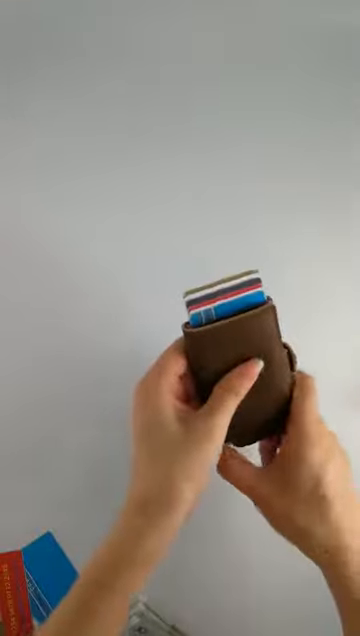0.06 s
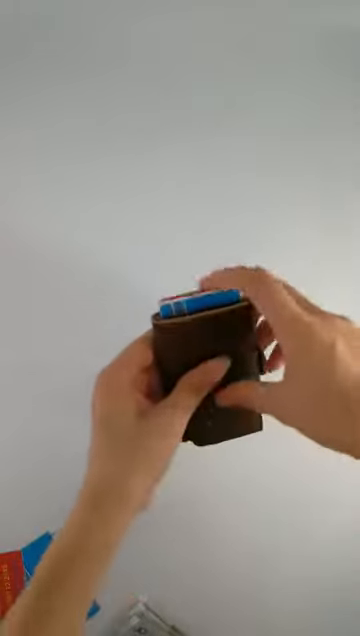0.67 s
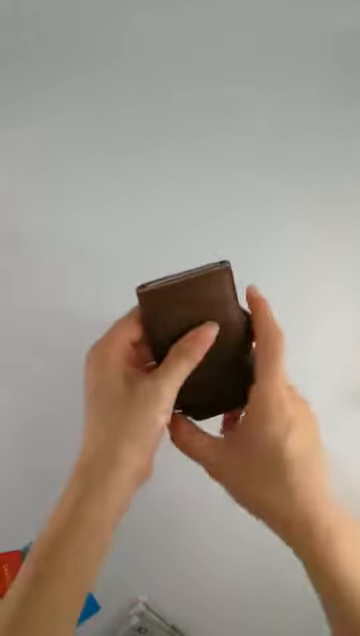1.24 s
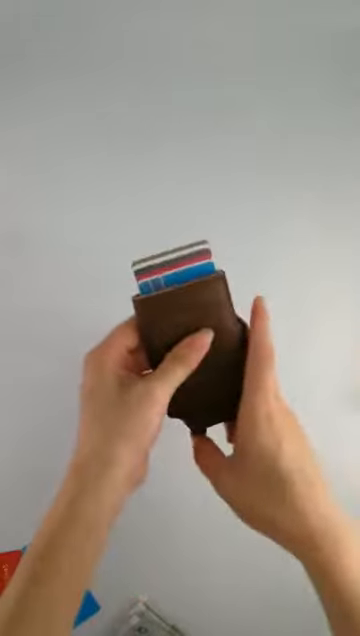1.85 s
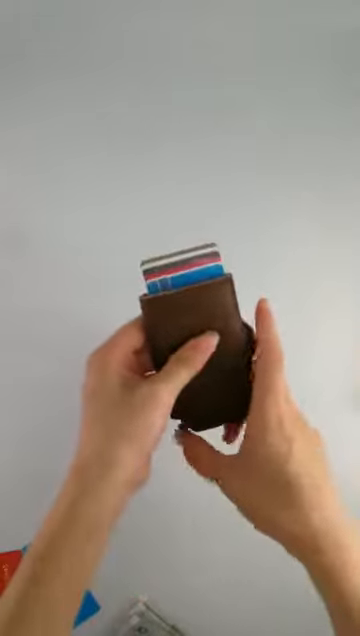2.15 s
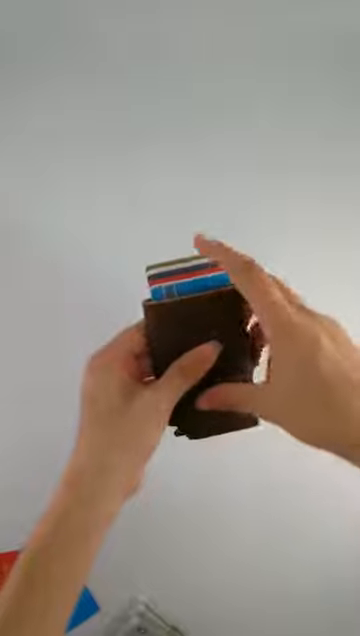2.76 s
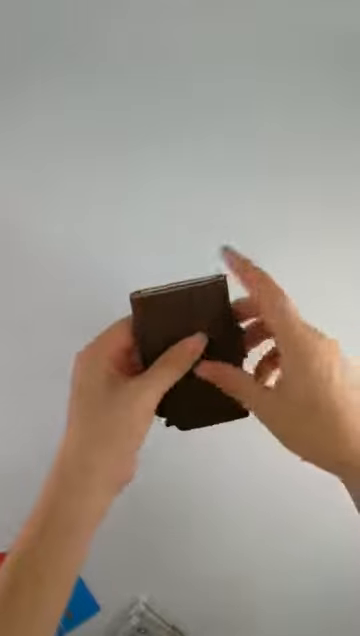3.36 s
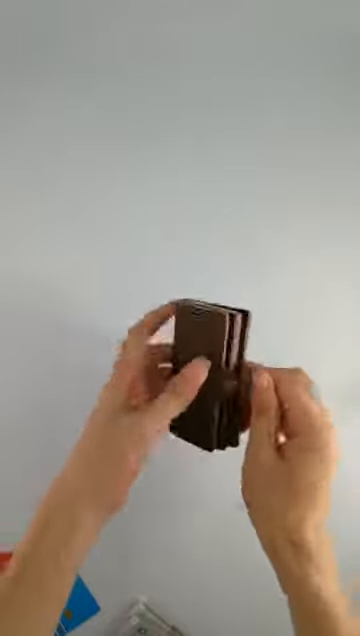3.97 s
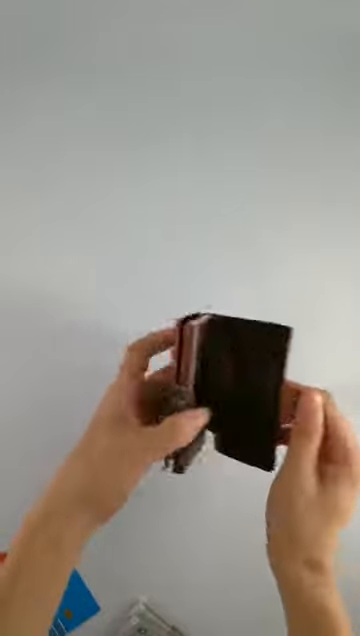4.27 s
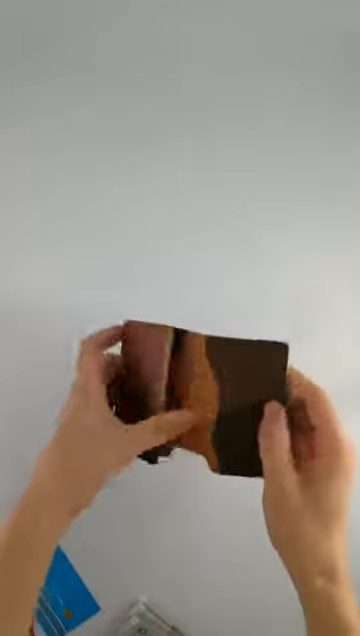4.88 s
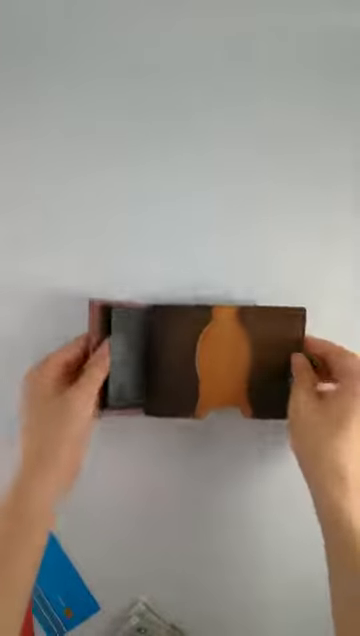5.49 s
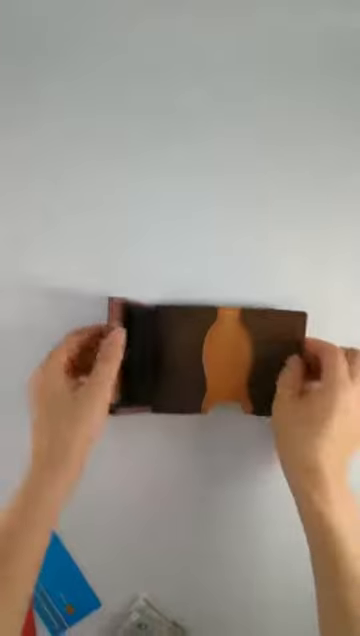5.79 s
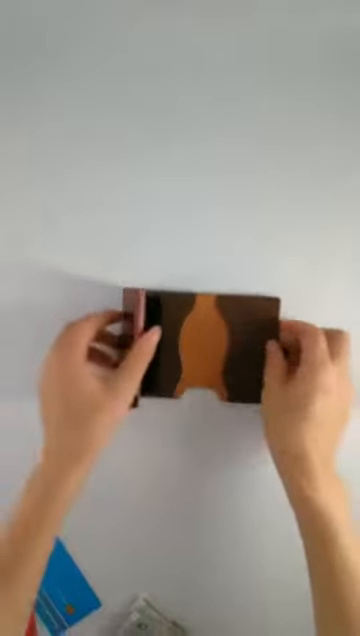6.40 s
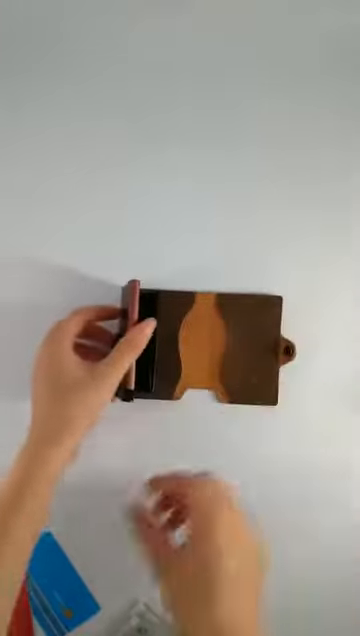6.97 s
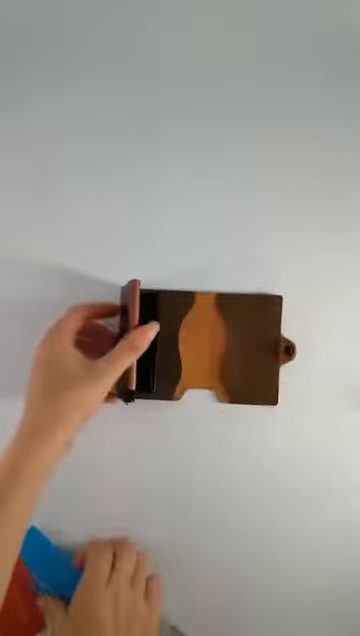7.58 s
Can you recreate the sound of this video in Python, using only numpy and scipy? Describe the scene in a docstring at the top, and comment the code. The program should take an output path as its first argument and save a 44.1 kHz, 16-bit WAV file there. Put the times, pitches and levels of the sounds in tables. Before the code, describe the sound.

A spring-loaded card wallet clicks and snaps sharply, then leather rustles open and loose cards scrape a table over a low room hum.

```python
"""A wallet with a pop-up card case

A leather wallet with a spring-loaded metal card case is handled above a table in a small, humming room.
The lever clicks, the cards pop up and are pushed back, the press stud snaps open and the flaps unfold.
Then an arm slides across the table and the hand drags some loose cards. The clicks are short blows
that make the metal ring; the rubbing and scraping are many tiny slips over a smooth hiss."""
import sys
import numpy as np
from scipy import signal
from scipy.fft import rfft, irfft
from scipy.io import wavfile
from scipy.ndimage import uniform_filter1d

SR = 44100
rng = np.random.default_rng(int(sys.argv[2]) if len(sys.argv) > 2 else 0)


def output_pcm(signal):
    """Save a mono or channel-first signal as 16-bit PCM at the path in sys.argv[1].

    Samples are clipped to [-1, 1] before scaling.
    """
    pcm = np.clip(np.atleast_2d(signal).T, -1, 1) * 32767
    wavfile.write(sys.argv[1], SR, np.round(pcm).astype(np.int16))


N = 341334
TIME = np.arange(N) / SR

# Levels in the tables are relative: they set how strong the rows are next to one another.
# The steady hum of the room. Each row: pitch in Hz, level in dB.
HUM_TONES = [(43.1, -66.5), (102.3, -53.5), (150.7, -55), (301.5, -64), (759.0, -76)]
# The tone colour of the room's noise. Each row: frequency in Hz, level in dB.
AIR_COLOUR = [(13, -44), (22, -3.5), (53, -5.5), (92, -6), (142, -1.5), (246, -16.5), (306, -12.5),
              (414, -22.5), (758, -20.5), (1390, -22.5), (1550, -24.5), (2330, -28), (2600, -30),
              (13100, -50), (15500, -46)]
# How alike that noise is on both sides. Each row: frequency in Hz, likeness from -1 (opposite) to 1 (same).
AIR_LIKENESS = [(60, 0.98), (150, 1), (380, 0.053), (950, -0.13), (2380, 0.079), (5980, 0.1),
                (15000, -0.81)]

# Soft thuds of the stud's leather tab, then of the hand landing on the table and pulling at the cards.
# Each row: start in seconds, length in seconds, level in dB, pitch in Hz, width in Hz.
SOFT_THUDS = [(3.557, 0.012, -48.5, 700, 220), (7.181, 0.057, -53.5, 930, 500), (7.56, .16, -58, 260, 110)]
# Skin sliding over the table. Each row: time in seconds, level of the hiss in dB.
SKIN_HISS = [(6.5, -83), (6.757, -75.5), (6.87, -58), (7.238, -58.5), (7.322, -66.5), (7.44, -66.5)]
# Hollow tones of the table, each loudest at its own point of the arm's travel.
# Each row: pitch in Hz, width in Hz, level in dB, loudest moment in seconds, spread in seconds.
TABLE_TONES = [(326, 17, -63, 6.78, 0.12), (560, 60, -66, 6.97, 0.19), (925, 50, -61, 6.98, .2),
               (1150, 800, -58, 6.91, 0.24), (1270, 150, -57, 6.82, 0.07), (1166, 130, -65, 7.06, 0.15),
               (1520, 90, -59.5, 6.83, .05), (1630, 170, -60, 7.17, .22)]
# The open wallet, then the loose cards, are dragged over the table.
# Each row: start in seconds, length in seconds, level in dB.
TABLE_DRAGS = [(5.809, 0.031, -51), (5.893, 0.055, -54.5), (5.958, 0.065, -58), (7.518, 0.065, -56),
               (7.584, 0.12, -46)]
# The wallet, then the loose cards, rasp on the table.
# Each row: start in seconds, length in seconds, level in dB, centre in Hz, width in octaves.
TABLE_RASPS = [(5.812, .05, -50.5, 1950, .55), (7.583, 0.041, -44.5, 2700, .9),
               (7.65, 0.052, -39.5, 3200, .5)]

# The bass, middle and treble of a rub. Each row: low edge in Hz, high edge in Hz.
RUB_BANDS = [(880, 1830), (2200, 7900), (5600, 14800)]
# Fingers and flaps rub on leather.
# Each row: start in seconds, length in seconds, level in dB, brightness in dB.
LEATHER_RUBS = [ (0.531, 0.1, -66, 12.5), (0.85, .03, -72, 5), (1.37, 0.05, -79, 19),
                (1.514, 0.099, -60, -2), (2.828, 0.047, -73.5, 7), (2.901, 0.1, -65, 7),
                (3.195, 0.044, -65, 3.5), (3.738, 0.11, -62, -1), (3.8, .05, -65, 6), (4.19, .05, -68, 2),
                (4.278, 0.06, -63.5, 4.5), (4.44, .04, -69, 4), (4.508, 0.03, -49.5, -1),
                (4.737, 0.12, -75, 0), (4.88, 0.18, -61.5, 4.5), (5.35, 0.097, -73.5, 2),
                (5.81, 0.06, -60, 0), (5.89, .12, -67, 2)]
# The fingers keep shifting their grip, more while the flaps unfold. Same columns as the rubs.
GRIP_SHIFTS = [(0, 4.1, -75, 0.5), (4.163, 2.1, -70, -0.5)]
# The leather crackles where it is bent. Each row: start in seconds, length in seconds, level in dB.
LEATHER_BENDS = [(4.195, .06, -59), (4.31, .05, -57), (4.9, .12, -49), (5.9, .14, -54)]
# The case scrapes out of the flap and sings.
# Each row: start in seconds, length in seconds, level in dB, strength of the upper notes in dB.
CASE_SQUEAKS = [(4.902, .017, -43, -14), (4.94, 0.05, -52.5, 0), (4.984, 0.021, -40.5, -1)]
# The notes it sings, lowest first. Each row: pitch in Hz, width in Hz, level in dB.
SQUEAK_TONES = [(2630, 300, 2), (3500, 400, -5), (4580, 380, 0.5), (5030, 240, -5), (5900, 500, -11)]

# Loose cards skid over the table.
# Each row: start in seconds, length in seconds, level in dB, brightness in dB.
CARD_SKIDS = [(7.035, 0.025, -49, -2), (7.184, 0.042, -50.5, 3.5), (7.454, 0.053, -50.5, 3),
              (7.566, 0.069, -44, 7), (7.664, 0.042, -43, 10.5)]
# The broad tone colour of a skidding card. Each row: centre in Hz, width in Hz, level in dB.
SKID_COLOUR = [(2900, 1800, 10), (10500, 4500, 2)]
# Cards slide in the case; how far the stack sticks out sets its pitch. The last row is the soft,
# fading wash of echo after the loud snap. Each row: start in seconds, length in seconds, level in dB,
# brightness in dB, pitch in Hz, fade time in seconds.
CARD_SLIDES = [ (1.52, 0.098, -55, 5, 7000, .01), (1.655, 0.066, -48.5, -.5, 3600, .006),
               (1.705, .022, -57, 8, 6900, .005), (1.909, 0.029, -39, 3, 3900, .004),
               (1.975, 0.115, -44, -7.5, 2650, .072)]

# The ringing tones of the case with its cards, of the lever and of the press stud.
# Each row: pitch in Hz, width in Hz, level in dB.
CASE_TONES = [(1040, 90, 4), (1591, 150, 9), (1690, 200, 3.5), (2200, 250, -3.5), (2540, 300, 6.5),
              (2780, 420, 10), (3480, 450, 3.5), (3950, 240, 3.5), (4290, 200, 5), (4660, 180, 3),
              (5660, 220, -2), (6860, 500, -1.5), (7930, 530, -2.5), (9600, 400, -12), (11450, 600, -5.5),
              (13100, 700, -7), (14900, 400, -5)]
LEVER_TONES = [(1030, 90, 5), (1600, 300, -2), (2050, 280, 3), (2470, 260, 9), (3490, 330, 1),
               (3950, 380, 10), (4720, 400, 4), (5300, 500, -4), (7140, 600, -3)]
STUD_TONES = [(1010, 110, 6), (1590, 320, 8), (2130, 300, 0), (2500, 260, 7), (4150, 600, 3),
              (7100, 900, -4), (8040, 600, -5), (10900, 1500, -6)]
# The six bands of a click, from low to high: thud, body, ring, edge, treble and top. Each row:
# low edge in Hz, high edge in Hz, chatter over blow in dB, left over right in dB.
CLICK_BANDS = [(930, 1130, -9, -0.5), (1360, 1850, -9, -0.5), (2100, 4000, 0.5, 2), (3500, 6200, 11, 4),
               (6000, 9100, 15, 3.5), (9600, 15500, 14, 6.5)]
# Knocks on the case, cushioned by leather. Each row: start in seconds, level in dB, contact in seconds.
SOFT_KNOCKS = [(1.3635, -54, 0.0019), (1.524, -51, 0.0036), (3.793, -56, .009), (4.286, -53, 0.01),
               (5.616, -51, 0.019), (6.12, -47.5, 0.028)]
# The basic tone colour of a knock: one level in dB for each of the six bands.
KNOCK_COLOUR_DB = (-11, -1.5, -11, -13, -15, -20)
# Cards and flaps click on the case; where they hit decides which bands are strong.
# Each row: start in seconds, contact time in seconds, then a level in dB for each of the six bands.
CASE_CLICKS = [ (1.9305, 0.0022, -47.5, -33.5, -37.5, -42, -46, -56),
               (1.9457, 0.006, -34.5, -22.5, -13, -10.5, -10.5, -13.5),
               (4.3015, 0.007, -55, -41, -54, -54.5, -52.5, -57),
               (4.76, .003, -61, -58, -56, -63, -67, -72), (4.8836, 0.0031, -57, -51, -52, -53.5, -57, -62),
               (4.897, 0.0053, -59, -53, -58, -44.5, -46, -53),
               (4.911, 0.0057, -61, -50, -44, -44, -49, -56),
               (5.582, 0.008, -72, -66, -59.5, -59.5, -63.5, -68),
               (5.813, 0.009, -55, -55, -51, -49.5, -54, -58.5),
               (7.463, 0.0041, -58.5, -55, -51, -48, -55.5, -60),
               (7.589, 0.0078, -64, -66, -49, -54, -54, -58)]
# The lever catches and the press stud pops open. One row each, with the same columns as the clicks.
LEVER_CLICK = (1.6267, 0.0034, -47, -47, -29.5, -30, -39.5, -46.5)
STUD_POP = (3.559, 0.0028, -36.5, -29.5, -29.5, -33, -37, -39.5)


def from_db(db):
    """Turn decibels into a number to multiply a sound by."""
    return 10 ** (np.asarray(db) / 20)


def unit_level(x):
    """Scale a sound so that its average power is 1."""
    return x / np.sqrt(np.mean(x ** 2) + 1e-20)


def at_hz(points, hz):
    """Read between the rows of a table, giving every octave equal room."""
    row_hz, values = np.transpose(points)
    return np.interp(np.log(hz + 1e-9), np.log(row_hz), values)


def panned(x, pan_db):
    """Make the left side stronger than the right by pan_db."""
    return x * from_db([[pan_db / 2], [-pan_db / 2]])


def band(x, low_hz, high_hz, order):
    """Keep the sound between two frequencies; a higher order cuts more steeply."""
    edges_hz = [low_hz, min(high_hz, SR / 2 - 1000)]
    return signal.sosfilt(signal.butter(order, edges_hz, "band", fs=SR, output="sos"), x)


def drift(per_s):
    """A random curve that heads for a new value per_s times a second."""
    targets = rng.standard_normal(int(N / SR * per_s) + 2)
    return unit_level(np.interp(TIME * per_s, np.arange(len(targets)), targets))


def stereo(mid, side, likeness):
    """Mix two unrelated sounds into a left and a right that are as alike as asked."""
    likeness = np.clip(likeness, -1, 1)
    return np.sqrt(1 + likeness) * mid + np.sqrt(1 - likeness) * side * [[1], [-1]]


def stroke(start, length, attack_s, release_s):
    """The loudness of one movement: it gathers speed, holds it, and dies away."""
    rise = np.clip((TIME - start) / attack_s, 0, 1)
    return rise * np.exp(-np.clip((TIME - start - length) / release_s, 0, 20))


def resonate(force, tones, direct_db):
    """A force makes an object ring at its own tones; some sound also comes straight from the contact."""
    out = from_db(direct_db) * force
    for hz, width, db in tones:
        decay = np.exp(-np.pi * width / SR)   # a wider tone dies sooner
        feed = np.array([1, 0, -1]) * (1 - decay * decay) / 2
        feedback = [1, -2 * decay * np.cos(2 * np.pi * hz / SR), decay * decay]
        out = out + from_db(db) * signal.lfilter(feed, feedback, force)
    return out


def friction(per_s, spread_db, smooth_db):
    """Tiny slips of uneven size over a smooth hiss, different on each side."""
    slips = (rng.random((2, N)) < per_s / SR) * rng.choice([-1, 1], (2, N))
    sizes = from_db(spread_db * np.minimum(rng.exponential(1, (2, N)), 4))
    hiss = from_db(smooth_db) * rng.standard_normal((2, N))
    return stereo(*(unit_level(slips * sizes) + hiss), likeness=0.037)


def rubbed(grains, strokes, band_db, attack_s, release_s, top_hz=13000):
    """Shape friction noise into strokes; a bright stroke lifts the treble and thins the bass."""
    shapes = [(stroke(start, length, attack_s, release_s), db, bright)
              for start, length, db, bright in strokes]
    out = 0
    for tilt, (low, high), gain_db in zip((-1, 0, 1), RUB_BANDS, band_db):
        power = sum((from_db(db + tilt * bright) * shape) ** 2 for shape, db, bright in shapes)
        out = out + from_db(gain_db) * np.sqrt(power) * unit_level(band(grains, low, high, order=2))
    return band(out, 450, top_hz, order=1)   # slips are softer than blows, so the very top is weaker


def background(air_db=-50.5, waver_db=1.0, wander_rad=0.82, ease_s=6.72, ease_db=-5, hiss_db=-76):
    """Room air, a wavering hum and faint microphone hiss; the deepest part eases off near the end."""
    hz = np.arange(N // 2 + 1) * SR / N
    spectrum = stereo(*rfft(rng.standard_normal((2, N))), likeness=at_hz(AIR_LIKENESS, hz))
    air = from_db(air_db) * unit_level(irfft(spectrum * from_db(at_hz(AIR_COLOUR, hz)), N))
    hum = 0
    for pitch_hz, db in HUM_TONES:
        waver = from_db(waver_db * drift(per_s=11))
        tone = np.sin(2 * np.pi * pitch_hz * TIME + wander_rad * drift(per_s=9))
        hum = hum + from_db(db - 1) * unit_level(waver * tone)
    hiss = from_db(hiss_db) * unit_level(band(rng.standard_normal((2, N)), 9500, 21000, order=1))
    deep = signal.sosfiltfilt(signal.butter(4, 120, fs=SR, output="sos"), air + hum)
    easing = from_db(ease_db * np.clip((TIME - ease_s) * 2 + .5, 0, 1))
    return air + hum + hiss + deep * (easing - 1)


def hand_bumps(level_db=-44.5):
    """The hands bump dully as the flaps swing open: a low rumble, the same on both sides."""
    rumble = unit_level(band(rng.standard_normal(N), 66, 123, order=2))
    return from_db(level_db) * rumble * stroke(start=4.66, length=0.33, attack_s=0.039, release_s=0.039)


def soft_thuds(attack_s=0.0066, release_s=0.0096):
    """Soft things meet with a short, low puff of noise."""
    push = stereo(*rng.standard_normal((2, N)), likeness=0.7)
    out = 0
    for start, length, db, hz, width in SOFT_THUDS:
        puff = unit_level(band(push, hz - width / 2, hz + width / 2, order=2))
        out = out + from_db(db) * stroke(start, length, attack_s, release_s) * puff
    return out


def arm_slide(skin_db=3, uneven_db=2.0, catches_per_s=25, speed_up_s=0.15):
    """Skin hisses and catches on the table, whose hollow tones change as the arm travels."""
    push = stereo(*rng.standard_normal((2, N)), likeness=0.31)
    drone = 0
    for hz, width, db, peak_s, spread_s in TABLE_TONES:
        swell = np.exp(-((TIME - peak_s) / spread_s) ** 2 / 2)
        tone = unit_level(band(push, hz - width / 2, hz + width / 2, order=2))
        drone = drone + from_db(db) * swell * tone
    drone = drone * from_db(uneven_db * drift(catches_per_s))
    times, hiss_db = np.transpose(SKIN_HISS)
    noise = stereo(*rng.standard_normal((2, N)), likeness=0)
    hiss = from_db(np.interp(TIME, times, hiss_db) + skin_db) * unit_level(band(noise, 870, 8100, order=1))
    speed = np.clip((TIME - times[0]) / speed_up_s, 0, 1)
    return speed * (drone + panned(hiss, pan_db=3.0))


def table_drags(attack_s=0.0031, release_s=0.047):
    """Flat things rub over the table top with a dull, coarse sound."""
    slips = band(friction(per_s=1400, spread_db=-1.5, smooth_db=-4), 1360, 2780, order=1)
    dull_slips = unit_level(band(slips, 180, 4000, order=1))
    power = sum((from_db(db) * stroke(start, length, attack_s, release_s)) ** 2
                for start, length, db in TABLE_DRAGS)
    return dull_slips * np.sqrt(power)


def table_rasps(attack_s=0.011, release_s=.014, judder_db=4.0, judders_per_s=180):
    """Edges judder over the table top in a narrow, throaty band."""
    slips = friction(per_s=2100, spread_db=12.5, smooth_db=-11) * from_db(judder_db * drift(judders_per_s))
    out = 0
    for start, length, db, hz, octaves in TABLE_RASPS:
        edge_ratio = 2 ** (octaves / 2)
        rasp = unit_level(band(slips, hz / edge_ratio, hz * edge_ratio, order=3))
        out = out + from_db(db) * stroke(start, length, attack_s, release_s) * rasp
    return out


def leather_rustle(attack_s=0.04, release_s=0.0086, uneven_db=2, shifts_per_s=13):
    """Fingers and flaps rub the leather: clear, soft strokes over the faint shifting of the grip."""
    grains = resonate(friction(per_s=1600, spread_db=8.0, smooth_db=1.5), CASE_TONES, direct_db=2.5)
    band_db = (-1, 0, 0)
    rubs = rubbed(grains, LEATHER_RUBS, band_db, attack_s, release_s)
    grip = rubbed(grains, GRIP_SHIFTS, band_db, attack_s, release_s)
    return panned(rubs + grip * from_db(uneven_db * drift(shifts_per_s)), pan_db=5.0)


def leather_crackle(ticks_per_s=170, spread_db=4.0, low_hz=1500, high_hz=5000, pitches=7):
    """Fibres of the bent leather let go one by one, each with a tiny tick at one of a few pitches."""
    sizes = from_db(spread_db * np.minimum(rng.exponential(1, N), 3)) * rng.choice([-1, 1], N)
    ticks = sizes * (rng.random(N) < ticks_per_s / SR)
    pitch_choice = rng.integers(0, pitches, N)
    crackle = sum(resonate(ticks * (pitch_choice == k) + 1e-18, [(hz, hz * .2, 0)], direct_db=-24) / hz
                  for k, hz in enumerate(np.geomspace(low_hz, high_hz, pitches)))
    bending = sum(from_db(db) * stroke(start, length, attack_s=.012, release_s=.02)
                  for start, length, db in LEATHER_BENDS)
    return panned(unit_level(crackle) * bending, pan_db=2.5)


def case_squeaks(attack_s=0.015, release_s=0.0092, judder_db=2.5, judders_per_s=220):
    """The metal case sticks and slips against the flap, singing mostly one note at first, then several."""
    slips = friction(per_s=1100, spread_db=-1.5, smooth_db=0) * from_db(judder_db * drift(judders_per_s))
    lowest = band(resonate(slips, SQUEAK_TONES[:1], direct_db=-21), 1300, 7800, order=1)
    upper = band(resonate(slips, SQUEAK_TONES[1:], direct_db=-21), 1300, 7800, order=1)
    out = 0
    for start, length, db, upper_db in CASE_SQUEAKS:
        notes = unit_level(lowest + from_db(upper_db) * upper)
        out = out + from_db(db) * stroke(start, length, attack_s, release_s) * notes
    return panned(out, pan_db=8.0)


def sliding_cards(attack_s=0.021, judder_db=2.0, judders_per_s=140, stack_db=-2):
    """Card edges catch and slip: on the table they only hiss, inside the case they ring case and stack."""
    slips = friction(per_s=1100, spread_db=0.5, smooth_db=-6) * from_db(judder_db * drift(judders_per_s))
    skid = resonate(slips, SKID_COLOUR, direct_db=-9)
    out = rubbed(skid, CARD_SKIDS, band_db=(-7, -.5, -4), attack_s=attack_s, release_s=0.0096)
    case = unit_level(resonate(slips, CASE_TONES, direct_db=2.5))
    for start, length, db, bright, hz, release_s in CARD_SLIDES:
        stack = unit_level(resonate(slips, [(hz, hz * .3, 0)], direct_db=-40))
        out = out + rubbed(case + from_db(stack_db) * stack, [(start, length, db, bright)],
                           band_db=(-13, 0, -4), attack_s=attack_s, release_s=release_s, top_hz=10000)
    return panned(out, pan_db=3.5)


def strike(tones, contact_s, levels_db, blow_db=0, rise_share=.3, size=8192):
    """One blow and a brief chatter set the metal ringing; the chatter carries the treble."""
    t = TIME[:size]
    swell = (1 - np.exp(-t / (rise_share * contact_s))) * np.exp(-(t / contact_s) ** 2)
    noise = stereo(*rng.standard_normal((2, size)), likeness=0.067)
    chatter = unit_level(noise * swell) / np.sqrt(size)
    blow = from_db(blow_db) * signal.unit_impulse(size)
    out = 0
    for (low, high, chatter_db, pan_db), db in zip(CLICK_BANDS, levels_db):
        force = blow + from_db(chatter_db) * chatter + 1e-18
        ring = band(resonate(force, tones, direct_db=-12), low, high, order=3)
        # the band's power if all its energy came within 8 milliseconds
        power = np.sum(ring ** 2, axis=1, keepdims=True) / np.sum(t < .008)
        out = out + panned(from_db(db) * ring / np.sqrt(power), pan_db)
    return out


def metal_clicks(dull_db_per_s=402, soften_db_per_s=900):
    """Lever, stud and case click sharply; knocks on the case through the leather are duller."""
    sharp = [(LEVER_TONES, LEVER_CLICK), (STUD_TONES, STUD_POP)]
    sharp += [(CASE_TONES, row) for row in CASE_CLICKS]
    hits = [(start, strike(tones, contact_s, levels_db)) for tones, (start, contact_s, *levels_db) in sharp]
    upper_bands = np.arange(len(CLICK_BANDS)) >= 2
    for start, db, contact_s in SOFT_KNOCKS:
        # a longer contact has weaker upper bands and is less of one clean blow
        levels_db = db + np.array(KNOCK_COLOUR_DB) - upper_bands * dull_db_per_s * contact_s
        hits.append((start, strike(CASE_TONES, contact_s, levels_db, blow_db=-soften_db_per_s * contact_s)))
    out = np.zeros((2, N))
    for start, hit in hits:
        first = int(start * SR)
        out[:, first:first + hit.shape[1]] += hit[:, :N - first]
    return out


def small_room(x, near_db=-3.0, near_fade_s=0.1, tail_db=-28, tail_fade_s=0.36, gap_s=0.001):
    """Quick echoes from table, hands and wall, then a faint, duller tail."""
    t = TIME[:SR]
    near, tail = rng.standard_normal((2, 2, SR)) * (1 - np.exp(-(t / gap_s) ** 2))
    near = band(near, 1300, 16000, order=1) * from_db(-60 * t / near_fade_s)
    tail = band(tail, 1900, 4500, order=1) * from_db(-60 * t / tail_fade_s)
    echoes = (from_db(near_db) * unit_level(near) + from_db(tail_db) * unit_level(tail)) / np.sqrt(SR)
    return x + signal.fftconvolve(x, echoes, axes=1)[:, :N]


def scene():
    """Wallet, cards and arm sound in the small room, over the bumps of the hands and the hum."""
    handling = leather_rustle() + sliding_cards() + case_squeaks()
    handling = handling + table_drags() + table_rasps() + arm_slide() + soft_thuds()
    return small_room(metal_clicks() + from_db(-1) * handling) + hand_bumps() + background()


def record(dry, limit_db=-8.5, recover_db_per_s=30, cutoff_hz=15700):
    """Turn down anything too loud and recover slowly; clip what slips past and cut the highest treble."""
    power = np.abs(uniform_filter1d(dry ** 2, size=89)).max(axis=0)
    over_db = np.maximum(10 * np.log10(power + 1e-18) - limit_db, 0)
    recovery_db = recover_db_per_s * TIME
    dip_db = np.maximum.accumulate(over_db + recovery_db) - recovery_db
    limited = np.clip(dry * from_db(-uniform_filter1d(dip_db, size=45)), -.95, .95)
    return signal.sosfilt(signal.ellip(10, .1, 80, cutoff_hz, fs=SR, output="sos"), limited)


dry = scene()
out = record(dry)
output_pcm(out)
```